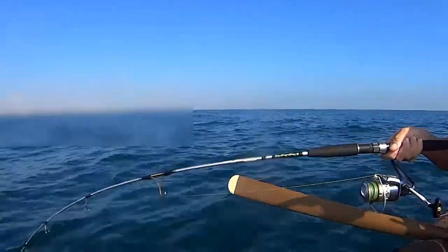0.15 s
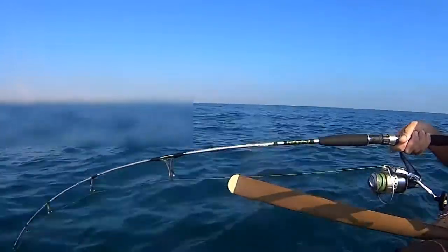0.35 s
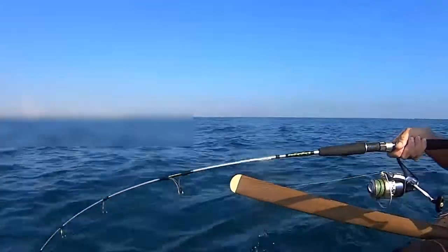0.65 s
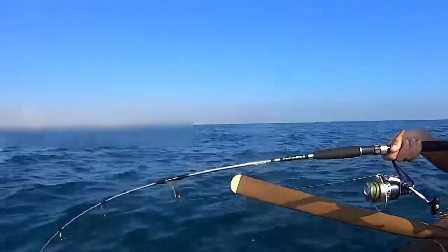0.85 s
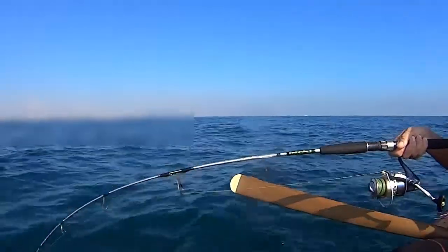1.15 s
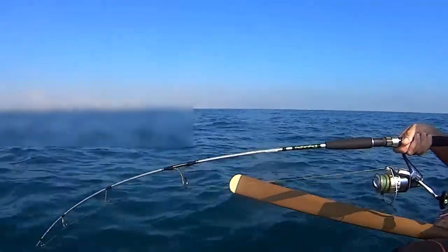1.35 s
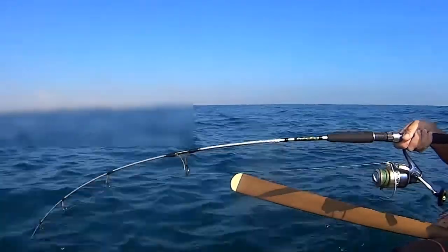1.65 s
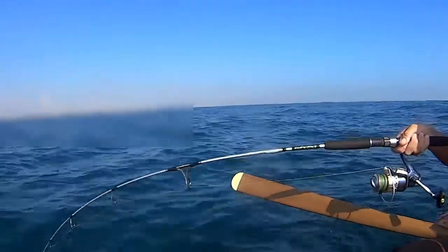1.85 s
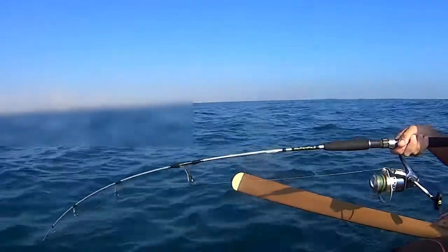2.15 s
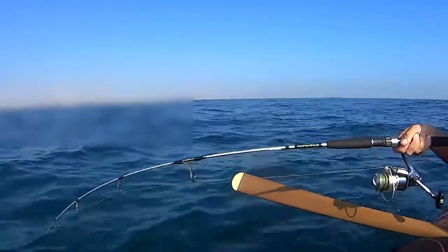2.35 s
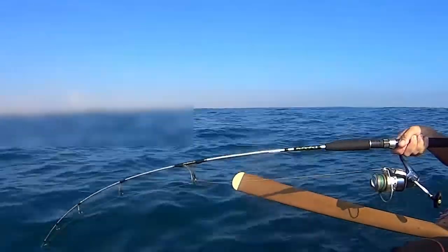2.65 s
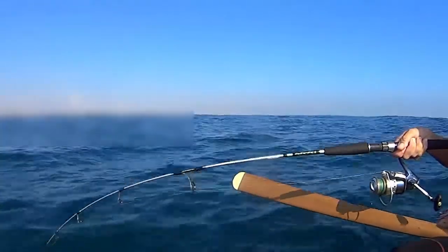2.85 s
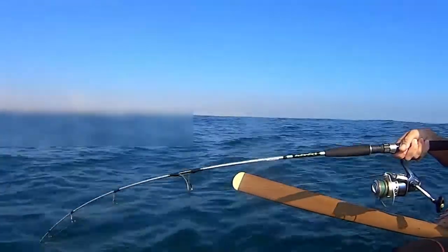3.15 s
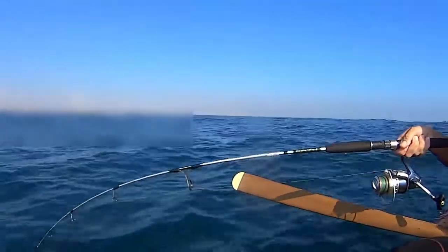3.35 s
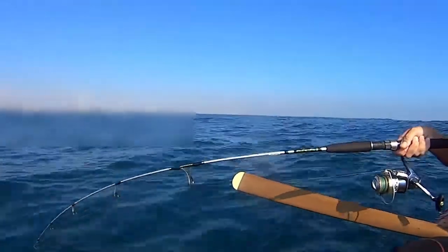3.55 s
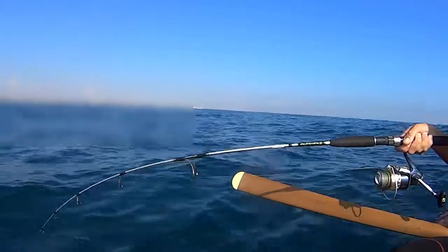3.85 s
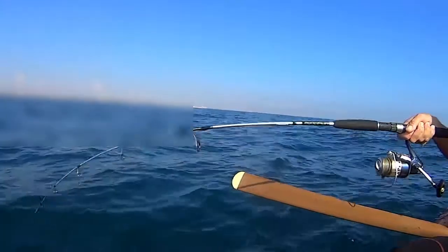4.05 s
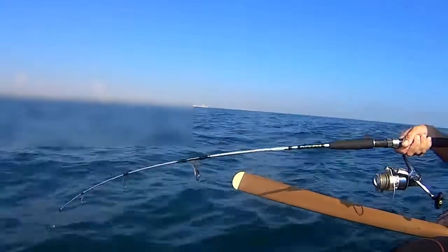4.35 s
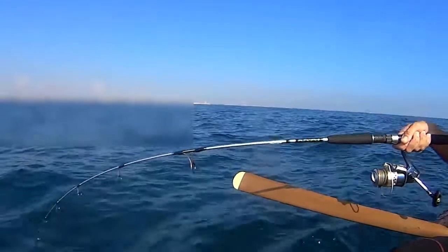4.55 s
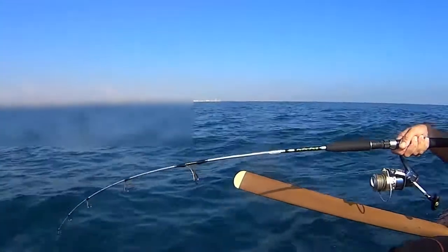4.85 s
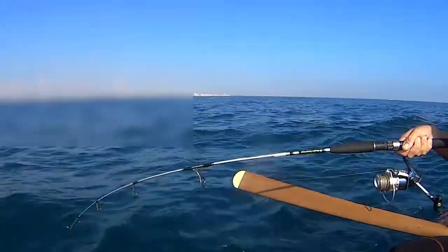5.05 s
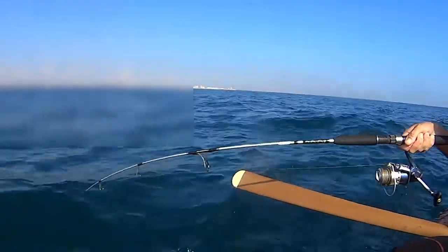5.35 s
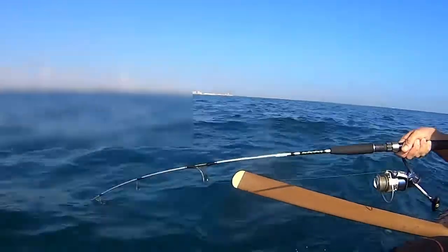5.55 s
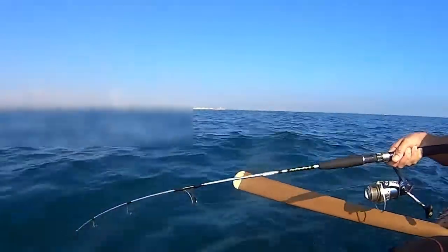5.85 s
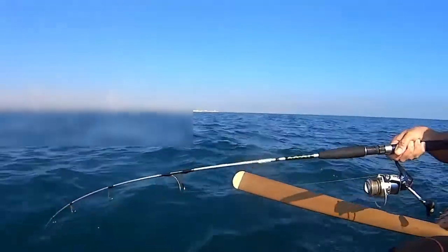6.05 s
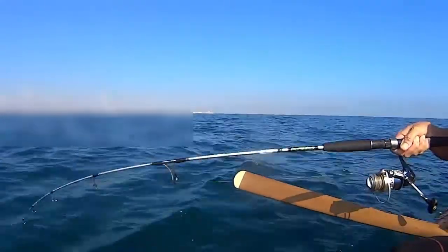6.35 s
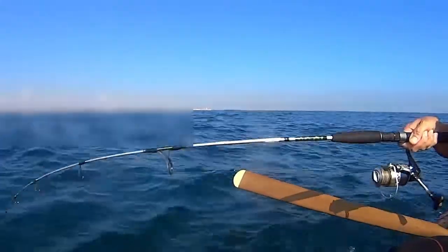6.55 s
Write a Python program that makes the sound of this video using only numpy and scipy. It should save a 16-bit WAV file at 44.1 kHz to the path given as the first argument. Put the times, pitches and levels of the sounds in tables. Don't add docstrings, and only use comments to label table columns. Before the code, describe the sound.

Metallic buzzing pulls of a spinning reel, then hollow thumps and sharp raps on a plastic hull over lapping water and faint hiss.

```python
import sys
import numpy as np
from scipy import signal
from scipy.fft import rfft, irfft
from scipy.io import wavfile
from scipy.ndimage import uniform_filter1d

SR = 44100
rng = np.random.default_rng(int(sys.argv[2]) if len(sys.argv) > 2 else 0)


def how_loud(loudness_db):
    steps = np.asarray(loudness_db, float) / 20
    return 10 ** steps


def dump_mix(stems):
    frames = np.atleast_2d(stems).T
    limited = np.clip(frames, -1, 1)
    pcm = np.round(limited * 32767).astype(np.int16)
    wavfile.write(sys.argv[1], SR, pcm)


N = 295911

# pitch_hz, left_over_right_db, left_leads_rad
PORT_RESPONSE = [(60, 0, -.5), (180, -4, -.2), (250, -5, .3), (320, -4, 1.3), (390, -3, -1.5),
                 (560, -1, -.3), (680, 1, -.7), (850, 2.5, -.9), (1150, 0, -.3), (1700, 1, -.4),
                 (2600, 2, .8), (3900, -2, 1.0), (5500, -3, .6), (9000, 0, -.2)]


def rms_one(x):
    return x / np.sqrt(np.mean(x ** 2) + 1e-20)


def peak_one(x):
    return x / np.abs(x).max()


def add_at(out, s, sound):
    start = round(s * SR)
    out[..., start:start + sound.shape[-1]] += sound


def in_time(rows):
    s, *columns = np.transpose(rows)
    return [np.interp(np.arange(N) / SR, s, c) for c in columns]


def bins_hz():
    return np.maximum(np.arange(N // 2 + 1) * SR / N, 1)


def at_hz(points, hz):
    table = np.array(points)
    return np.interp(np.log(hz), np.log(table[:, 0]), table[:, 1])


def drift(rate_hz):
    r = np.exp(-2 * np.pi * rate_hz * 40 / SR)
    noise = rng.standard_normal(N // 40 + 2002)
    slow = signal.lfilter([1], [1, -2 * r, r * r], noise)[2000:]
    return np.interp(np.arange(N) / 40, np.arange(len(slow)), rms_one(slow))


def resonate(x, hz, width_hz):
    r = np.exp(-np.pi * width_hz / SR)
    poles = [1, -2 * r * np.cos(2 * np.pi * hz / SR), r * r]
    return signal.lfilter(np.array([1, 0, -1]) * (1 - r * r) / 2, poles, x)


def shaped(x, spectrum):
    return irfft(rfft(x) * how_loud(at_hz(spectrum, bins_hz())), N)


def grains(per_s, spread_db):
    sizes = how_loud(spread_db * np.minimum(rng.exponential(1, N), 5)) * rng.choice([-1, 1], N)
    return rms_one(sizes * (rng.random(N) < per_s / SR))


def runs():
    # (time_s, ring_level_db)
    pulls = [
        (0, [(0.0, -43.5), (0.142, -62.5), (0.23, -52.5), (0.256, -64), (0.38, -49.5), (0.455, -62)]),
        (0, [(0.67, -65), (0.7, -47.5), (0.888, -49), (1.174, -48), (1.196, -53), (1.272, -42.5), (1.518, -41.5), (1.602, -42), (1.79, -57.5)]),
        (4, [(2.9, -70), (2.942, -54), (3.146, -58), (3.3, -51.5), (3.404, -45.5), (3.508, -46), (3.812, -43.5), (3.978, -45), (4.07, -60.5)]),
    ]
    # start_s, length_s, ring_level_db, sag_by_end_db, rasp_brightness_db
    short_tugs = [
        (1.927, 0.27, -46.5, 13.5, 2),
        (4.093, 0.14, -47.5, 7.5, 4),
        (4.3, 0.16, -48, 3.5, 5),
        (4.441, 0.25, -55, 7, 3.5),
        (5.075, 0.17, -56, 16, 4),
        (5.188, 0.155, -54, 9.5, 4.5),
        (5.445, 0.092, -53, -1, 2.5),
        (5.839, 0.089, -50.5, 24, 2.5),
    ]
    rise_s, start_db = 0.047, -15
    tugs = []
    for s, length_s, db, sag_db, bright_db in short_tugs:
        curve = [(s, db + start_db), (s + rise_s, db), (s + length_s, db - sag_db)]
        tugs.append((bright_db, curve))
    return pulls + tugs


def bites():
    # start_s, peak_level_db
    snaps = [(0.0044, -40), (0.058, -35), (0.123, -46), (0.155, -40.5), (0.2179, -38), (0.23, -43),
             (0.6938, -40), (0.8565, -37), (1.058, -43), (1.102, -39), (1.1546, -34.5), (1.2506, -40),
             (1.297, -31.5), (1.3613, -33), (1.447, -40), (1.486, -36), (1.5512, -31), (1.596, -29),
             (1.6194, -37), (1.978, -37.5), (2.1131, -41), (2.193, -41), (3.239, -39), (3.398, -33.5),
             (3.4655, -37), (3.486, -33.5), (3.713, -36), (3.7529, -50), (3.77, -34), (3.9664, -32),
             (4.132, -38), (4.316, -43), (4.371, -38), (4.431, -40.5)]
    t60_s, trim_db = 0.044, -3
    out, t = np.zeros(N + SR), np.arange(SR // 10) / SR
    for s, peak_db in snaps:
        fall = how_loud(peak_db + trim_db - 60 * (t / t60_s) ** 1.51)
        add_at(out, s, fall * np.minimum(t / 0.0026, 1))
    return out[:N]


def reel():
    # pitch_hz, width_hz, level_db
    spool = [(1370, 85, -4), (1695, 80, 8.5)]
    # pitch_hz, width_hz, level_db
    thin_parts = [(2650, 300, 9), (3708, 346, 11), (4020, 220, 12.5), (4300, 200, 10.5), (4570, 140, 11.5),
                  (4905, 280, 10.5), (5370, 170, 8), (6150, 450, 3), (7650, 670, -1), (9430, 450, -4),
                  (11700, 420, -9.5), (13400, 60, -5), (13900, 50, -7)]
    rasp_base_db, rasp_follows = -65.5, 1.16
    evenness = 0.19
    ring_gain, rasp_gain, t = np.zeros(N), np.zeros(N), np.arange(N) / SR
    for bright_db, run in runs():
        ring_db, = in_time(run)
        rasp_db = rasp_base_db + bright_db + rasp_follows * (ring_db + 50)
        gate = np.clip(np.minimum(t - run[0][0], run[-1][0] - t) / 0.017, 0, 1)
        ring_gain += gate * how_loud(ring_db)
        rasp_gain += gate * how_loud(rasp_db)
    speed = np.clip(ring_gain / how_loud(-45), .12, 1)

    slip = how_loud(2.5 * drift(28)) / np.sqrt(speed)
    teeth = grains(2500 * speed, 1.5) * slip
    low, high = (how_loud(db) * resonate(resonate(teeth, hz, 1.4 * w), hz, 2.26 * w) for hz, w, db in spool)
    ring = high + low * np.sqrt(speed)
    flutter = how_loud(0.9 * drift(29)) / np.sqrt(speed)
    ring = signal.sosfilt(signal.butter(4, 1950, fs=SR, output="sos"), ring)
    power = uniform_filter1d(uniform_filter1d(ring ** 2, size=90), size=90)
    ring = rms_one(ring / (power + 1e-12) ** (evenness / 2))

    shared = grains(5000 * speed, 2.2) * flutter
    sides = np.array([shared + .7 * grains(5000 * speed, 2.2) * flutter for side in range(2)])
    loose = (flutter * np.sqrt(speed)) ** 1.5
    rasp = 0
    for hz, w, db in thin_parts:
        rattle = np.roll(loose, int(37 * hz))
        rasp = rasp + how_loud(db) * rattle * resonate(resonate(sides, hz, 1.3 * w), hz, 3 * w)
    ring_level = np.hypot(how_loud(1.6) * ring_gain, bites())
    return ring_level * ring, how_loud(7.0) * rasp_gain * rms_one(rasp)


def wash():
    # time_s, level_db
    surges = [(0.0, -70), (0.37, -56), (1.81, -57.5), (2.18, -62.5), (2.65, -88), (3.16, -57.5),
              (3.4, -48.5), (3.57, -57), (4.24, -51.5), (4.37, -57), (4.7, -44), (4.9, -68.5),
              (5.16, -55.5), (5.68, -71.5), (5.96, -57), (6.2, -51.5), (6.5, -58), (6.71, -80)]
    # pitch_hz, density_db_per_hz
    slosh_colour = [(76, -16), (130, 1.5), (489, -6), (824, 1), (995, -14.5), (1680, -5.5), (2200, -23),
                    (2860, -59), (4840, -120)]
    hum_hz, hum_base_db, hum_follows = 78, -76.5, 1
    slosh_db, = in_time(surges)
    hum_db = hum_base_db + hum_follows * (slosh_db + 60)
    clicks, dealt = grains(260, 3.6), rng.integers(0, 16, N)
    gurgle = 0
    for k, hz in enumerate(np.geomspace(150, 2600, 16)):
        own_clicks = clicks * (dealt == k) + 1e-18
        gurgle = gurgle + resonate(own_clicks, hz, hz / 24.0) / np.sqrt(hz)
    gurgle_colour = [(hz, db + 3 * np.log2(hz)) for hz, db in slosh_colour]
    churn = rms_one(shaped(gurgle, gurgle_colour))
    churn = churn + 0.24 * rms_one(shaped(rng.standard_normal(N), slosh_colour))
    hum = resonate(resonate(rng.standard_normal(N), hum_hz, 63), hum_hz, 83)
    surge_db = 1.8 * drift(14)
    return how_loud(slosh_db - 3.5 + surge_db) * churn + how_loud(hum_db) * rms_one(hum)


def hiss():
    # pitch_hz, level_db
    hiss_colour = [(12, -12), (20, -2.5), (38, -7.5), (49, -11), (183, -11.5), (496, -11), (934, -14.5),
                   (1310, -12), (2540, -17.5), (6550, -22.5), (10800, -25.5), (14000, -53), (16000, -120)]
    # pitch_hz, left_right_likeness (0 to 1)
    likeness = [(25, 0.99), (70, 1), (200, 0.52), (600, 0), (3000, 0), (9000, 0.27)]
    level_db = -58.5
    mid, side = rfft(rng.standard_normal((2, N)))
    hz = bins_hz()
    alike = np.clip(at_hz(likeness, hz), 0, 1)
    pair = np.sqrt(1 + alike) * mid + np.sqrt(1 - alike) * side * np.array([[1], [-1]])
    return how_loud(level_db) * rms_one(irfft(pair * how_loud(at_hz(hiss_colour, hz)), N))


def panels():
    # start_s, peak_db, pitch_hz, left_over_right_db, ring_s
    panel_rings = [(0.018, -47.5, 363, -8, 0.067), (0.336, -41, 191, 3, 0.028),
                   (0.929, -43.5, 227, -0.5, 0.066), (1.129, -31.5, 204, -1.0, 0.032),
                   (1.504, -26, 341, 3, 0.045), (1.526, -32, 363, 1, 0.055), (1.802, -32.5, 203, -1, 0.063),
                   (3.215, -33, 354, -11, 0.042), (3.277, -14, 296, -1, 0.028),
                   (3.287, -14.5, 251, -8, 0.031), (3.323, -24, 259, -6, 0.037),
                   (3.514, -35, 364, -3.0, 0.037), (3.806, -29, 239, -5, 0.045), (3.923, -35, 320, -6, 0.05),
                   (4.092, -46, 233, -2.0, 0.03), (4.22, -35, 226, 0, 0.034), (4.277, -43, 336, 3, 0.036),
                   (4.47, -29, 244, -1.5, 0.05), (4.667, -57, 310, -1.5, 0.031),
                   (5.235, -32.5, 193, -1, 0.036), (6.041, -28, 252, -9, 0.053),
                   (6.137, -35, 349, -2.5, 0.045), (6.325, -34, 209, -2.0, 0.03),
                   (0.345, -37, 435, 1, 0.021), (1.13, -37, 860, 5, 0.023), (1.387, -40, 590, -2, 0.019),
                  (1.504, -27.5, 606, -6, 0.032), (1.802, -34.5, 576, -4, 0.033),
                  (2.655, -45.5, 826, -2, 0.059), (3.085, -42.5, 701, 3.5, 0.053),
                  (3.216, -36.5, 650, -4, 0.031), (3.282, -15.5, 705, 1.0, 0.036),
                  (3.291, -16.5, 733, -2, 0.026), (3.303, -15.5, 724, 5, 0.031),
                  (3.319, -22, 850, -2, 0.038), (3.338, -26.5, 723, 2, 0.055), (3.368, -23, 713, -3, 0.03),
                  (3.514, -25, 796, 1, 0.02), (3.631, -30.5, 873, 3, 0.024), (3.802, -23, 637, 11, 0.027),
                  (3.898, -35, 838, 5, 0.059), (3.924, -30.5, 860, 4, 0.05),
                  (4.209, -28.5, 837, 1.0, 0.038), (4.223, -26.5, 633, 1, 0.03),
                  (4.285, -25, 700, 3, 0.014), (4.395, -34.5, 826, 6, 0.023), (4.471, -30, 597, 6, 0.043),
                  (4.484, -35, 550, -2, 0.021), (4.67, -39, 832, 5, 0.027), (5.233, -36.5, 633, 0, 0.049),
                  (6.027, -26.5, 846, 3, 0.069), (6.152, -31, 632, 5, 0.025), (6.2, -38.5, 827, 5, 0.033),
                   (0.0451, -42, 1130, -3, 0.031), (1.8051, -32.5, 1122, 7, 0.022),
                  (3.2804, -26.5, 1420, -7, 0.012), (3.293, -16, 1098, 4, 0.03),
                  (3.318, -33, 1090, 10, 0.027), (3.3618, -26, 1175, 12, 0.023),
                  (3.5146, -29.5, 1177, 3, 0.024), (3.8041, -16, 1200, -1, 0.03),
                  (4.3625, -36, 1435, 3, 0.029), (4.724, -37, 1420, 0, 0.03),
                  (6.0255, -19.5, 1580, -1, 0.013), (6.034, -31, 1640, -1.5, 0.027),
                  (6.3262, -40.5, 1200, 2, 0.024), (6.453, -43, 1420, -3, 0.013),
                   (3.2794, -25, 2346, 2.0, 0.022),
        (3.2884, -24, 2570, 2.0, 0.017),
        (3.3114, -33.5, 2600, 3.8, 0.03),
        (3.336, -23, 1860, 2.0, 0.014),
        (3.8042, -17.5, 1860, 2.0, 0.015),
        (3.925, -24.5, 1880, 1.0, 0.013),
    ]
    rise_s, trim_db, sag = 0.0031, -3.0, 0.014
    out, t = np.zeros((2, N + SR)), np.arange(SR // 5) / SR
    for s, peak_db, hz, pan_db, ring_s in panel_rings:
        age = t / max(ring_s, .005)
        level = how_loud(peak_db + trim_db - 32.4 * age ** 1.66) * np.minimum(t / rise_s, 1)
        ring = level * np.sin(2 * np.pi * hz * t * (1 - sag * age))
        lean_db = pan_db - at_hz(np.array(PORT_RESPONSE)[:, :2], hz)
        add_at(out, s, np.outer(how_loud(np.array([.5, -.5]) * lean_db), ring))
    return out[:, :N]


def blows():
    # start_s, peak_db, lean_low_to_upper_modes_db, contact_s
    slaps = [(.039, -44.5, 2, 0.029), (.336, -39, -4, 0.017), (.689, -43.5, -1, 0.0099),
             (1.132, -40.5, 0.5, 0.014), (1.507, -22.5, -10.5, 0.016), (1.805, -33, -3, 0.015),
             (2.656, -35.5, 3, 0.014), (2.732, -41.5, 0.5, 0.0016), (3.289, -21.5, 1.5, 0.026),
             (3.514, -31.5, -1, 0.022), (3.734, -47, -20, 0.008), (3.805, -12.5, 7.5, 0.0068),
             (3.92, -31, 0, 0.027), (4.092, -43.5, 1, 0.012), (4.283, -36, -5, 0.0019),
             (4.439, -48, -15, 0.0054), (4.518, -53.5, -16, 0.0051), (5.034, -48, -20, 0.0047),
             (5.234, -35.5, -1.2, 0.019), (5.65, -49.5, 0.5, 0.0064), (5.987, -43.5, -9, 0.029),
             (6.025, -24.5, 4.5, 0.015), (6.198, -38.5, -2, 0.0095), (6.227, -42, -12, 0.0073),
             (6.325, -33.5, -8.5, 0.0081), (6.701, -40, -4, 0.0065)]
    taps = [(1.029, -49, 1, 0.012), (1.389, -39, -4.5, 0.022), (2.409, -50.5, 2, 0.012),
            (3.317, -22, 7.5, 0.026) , (3.633, -38.5, -2, 0.011), (4.207, -31.5, 0, 0.013),
            (4.224, -36, 4, 0.0042), (4.396, -36, 2.5, 0.0056), (4.417, -43.5, -7, 0.0051),
            (4.472, -29.5, -13.5, 0.0086), (5.075, -47, 6.5, 0.036), (5.421, -48.5, 8, 0.0056),
            (6.039, -31.5, -10, 0.019), (6.15, -32, -5, 0.023), (6.305, -45, 4, 0.0088)]
    raps = [(.318, -43.5, -1.5, .0071), (.622, -48.5, -1, 0.0072), (.93, -52.5, 4, 0.032),
            (3.086, -40, -0.5, 0.0079), (3.214, -33.5, -2, 0.0078), (3.278, -18, -1.5, 0.01),
            (3.34, -34, 0, 0.018), (3.364, -34, 1.5, 0.02), (4.665, -39, 0.5, 0.0035),
            (4.723, -42, 8, 0.036), (5.938, -42, 1, 0.0061), (6.133, -34.5, -1.5, 0.0074),
            (6.284, -43, -2.5, 0.014), (6.452, -47, 1.5, 0.014)]
    # middle modes above the other two (dB), crack above the upper modes (dB)
    kinds = (slaps, 0.32, -20.5), (taps, 6.2, -17), (raps, 0.18, 0.31)
    rows = []
    for table, focus_db, crack_db in kinds:
        for s, peak_db, lean_db, contact_s in table:
            shape = np.array([-lean_db, focus_db, lean_db])
            family_db = peak_db + shape - shape.max()
            rows.append((s, *family_db, family_db[2] + crack_db, contact_s))
    return sorted(rows)


def knocks():
    # pitch_hz, level_db, t60_s
    hull = [
        [(198.7, -3.5, 0.061), (236.6, 1.5, 0.042), (355.4, 1.5, 0.056), (413.4, -3, 0.13)],
        [(467.6, -2, 0.055), (567.6, -6.5, 0.098), (643.3, 6.5, 0.031), (738, 0, 0.061), (811, 1.5, 0.05)],
        [(1130, 0, 0.069), (1200, 4, 0.013), (1420, 3, 0.02), (1729, -12, 0.25), (1987, -2.5, 0.0051)],
    ]
    out, size = np.zeros((2, N + SR)), SR // 5
    t = np.arange(size) / SR
    crack_band = signal.butter(3, [1800, 2900], "band", fs=SR, output="sos")
    for s, *family_db, crack_db, contact_s in blows():
        noise, luck = rng.standard_normal(size), rng.standard_normal((3, 5, 3))
        push = noise * np.exp(-(t / max(contact_s, .002)) ** 2) * np.minimum(t / 0.00023, 1) + 1e-18
        push += 0.11 * noise * np.exp(-t / 0.055) * np.minimum(t / 0.0033, 1)
        push += 2.33 * np.exp(-t / 0.00033)
        blow = how_loud(crack_db - 2.5) * peak_one(signal.sosfilt(crack_band, push))
        for modes, db, chances, spread in zip(hull, family_db, luck, (.55, .4, .2)):
            rings = 0
            for (hz, mode_db, t60), (strength, load, spot) in zip(modes, chances):
                hz = hz * (1 + .02 * load)
                soft = resonate(push, hz, 0.26 * hz)
                ring = resonate(soft, hz, np.log(1000) / np.pi / t60) * np.sqrt(t60)
                ring = how_loud(mode_db + 2 * strength) * ring
                lean = spread * spot * (hz > 220)
                rings = rings + np.outer([1 + lean, 1 - lean], ring)
            blow = blow + how_loud(db - 0.5) * rings / np.abs(rings.mean(axis=0)).max()
        add_at(out, s, blow)
    return signal.sosfilt(signal.butter(8, 3150, fs=SR, output="sos"), out[:, :N])


def ratchet():
    # first_tooth_s, end_s, first_gap_ms, gap_over_last_gap, peak_db
    stretches = [(0.061, 0.155, 6.6, 1.32, -55), (0.298, 0.36, 11, 0.9, -60), (0.397, 0.45, 7.3, 1.36, -57),
                 (0.679, 0.73, 8, 0.88, -60), (0.735, 1.2, 4.2, 1.001, -61), (1.70, 1.8, 8, 1.06, -59),
                 (2.153, 2.205, 8, 1.28, -58), (2.916, 2.96, 10, 0.97, -58), (3.064, 3.15, 8.3, 1.11, -57),
                 (4.103, 4.15, 13, 0.82, -61), (4.442, 4.545, 8.5, 1.02, -61), (4.591, 4.625, 8, 1.2, -58),
                 (5.103, 5.29, 19.3, 1.01, -60), (5.505, 5.54, 5, 1.35, -57)]
    # pitch_hz, width_hz, level_db
    tooth = [(5500, 400, -7.5), (3620, 340, -12), (4450, 480, -13.5)]
    out, step = np.zeros((len(tooth), N)), np.arange(120)
    for s, end_s, gap_ms, stretch, peak_db in stretches:
        luck = rng.standard_normal((len(step), 4))
        gaps_s = gap_ms / 1000 * stretch ** step * (1 + .025 * luck[:, 0])
        times = s + np.cumsum(gaps_s) - gaps_s
        on = times < end_s
        out[:, (times[on] * SR).astype(int)] = how_loud(peak_db + 1.5 * luck[on, 1:].T)
    total = 0
    for clicks, (hz, w, db) in zip(out, tooth):
        ring = resonate(resonate(clicks + 1e-18, hz, w), hz, 2 * w)
        total = total + how_loud(db) * SR / w * ring
    return total


def drops():
    # start_s, peak_db, start_pitch_hz, ring_t60_s
    plops = [(.268, -50, 1240, 0.018), (0.4349, -50, 1092, 0.091), (0.4746, -39.5, 1140, 0.033),
             (0.505, -49, 1526, 0.042), (.5354, -50.5, 670, 0.025), (.622, -42, 2580, 0.014),
             (1.573, -45, 1190, 0.035), (2.371, -50, 1510, 0.017), (2.383, -55.5, 586, 0.046),
             (2.656, -37.5, 1960, 0.028), (2.832, -55.5, 1086, 0.054), (5.115, -40.5, 1620, .025),
             (5.297, -50.5, 1220, 0.051), (5.59, -56, 1330, 0.06), (5.7224, -54, 1400, 0.03),
             (5.894, -48.5, 1330, .018), (6.3876, -50.5, 1420, 0.02), (6.682, -59, 1370, 0.031)]
    spray = [(3.084, -50, 3330, 0.019), (0.7844, -54, 2400, 0.04), (0.8, -44, 2000, 0.022),
             (4.989, -55.5, 3000, 0.021), (3.914, -52, 1910, 0.02), (4.0344, -52, 2580, 0.024),
             (4.162, -39.5, 2460, 0.01), (4.364, -48, 2610, 0.041), (4.9412, -53.5, 2030, 0.027),
             (5.109, -42, 2650, 0.011), (5.344, -52, 2740, 0.013), (6.176, -53.5, 2570, 0.041),
             (6.1973, -55, 2650, 0.028), (6.3011, -48, 2380, 0.016)]
    glides = [
        (5.214, -46, 1194, 0.041),
        (5.325, -54, 904, 0.043),
        (6.083, -51, 1380, .02),
        (6.157, -37.5, 1162, 0.034),
        (6.171, -37.5, 1380, 0.036),
        (6.376, -53, 1318, 0.042),
        (4.358, -44, 1240, 0.026),
    ]
    # start_s, peak_db, ring_t60_s
    creep = [
        (0.169, -45, 0.028),
        (0.2987, -42, 0.019),
        (4.733, -40.5, 0.023),
        (4.889, -38, 0.023),
        (5.1555, -41, 0.016),
        (5.2605, -30.5, 0.011),
        (5.559, -46.5, 0.023),
        (5.6258, -49, 0.053),
        (6.0984, -51, 0.027),
        (6.574, -52, 0.034),
    ]
    rows = [(*drop, 0.069) for drop in plops]
    rows += [(*drop, 0.068) for drop in spray]
    rows += [(*drop, 0.332) for drop in glides]
    rows += [(s, db, 1697, t60, 0.042) for s, db, t60 in creep]
    out, t = np.zeros(N + SR), np.arange(SR // 5) / SR
    for s, peak_db, hz, t60, rise in rows:
        age = t / max(t60, .005)
        phase = 2 * np.pi * np.cumsum(.97 * hz * 2 ** np.minimum(rise * age * 2, 2)) / SR
        wobble = 1 + 0.58 * np.sin(2 * np.pi * (110 * t + rng.random()))
        level = how_loud(peak_db + 2.5 - 60 * age ** 2) * np.minimum(t / 0.0034, 1)
        add_at(out, s, level * np.sin(phase) * wobble)
    return out[:N]


def booms():
    # start_s, peak_db, pitch_hz
    hull_air = [(0.337, -54, 103.3), (1.133, -53, 91), (1.507, -52, 92), (1.803, -49, 97.3),
                (3.276, -31, 101.3), (3.401, -45.5, 98.7), (3.516, -51.5, 99), (3.802, -44.5, 94.6),
                (3.917, -50, 97.2), (4.47, -54, 99.2), (4.729, -51.5, 91.8), (5.235, -50.5, 98),
                (5.561, -52.5, 83), (5.618, -52, 74.4), (6.029, -51, 95.6), (6.144, -52.5, 98),
                (6.2, -56, 101), (6.331, -52, 102)]
    out, t = np.zeros(N + SR), np.arange(SR // 2) / SR
    shove = 0.41 * np.sin(2 * np.pi * 45 * t) * np.exp(-t / 0.024)
    for s, peak_db, hz in hull_air:
        cycles = hz * (.9 * t + .012 * (1 - np.exp(-t / 0.041)))
        swell = how_loud(-60 * t / 0.44) * np.sin(2 * np.pi * cycles) * (1 - np.exp(-t / 0.0024))
        slop = .5 * how_loud(-60 * t / 0.34) * rms_one(resonate(rng.standard_normal(len(t)), 121, 76))
        other = 0.53 * how_loud(-60 * t / 0.35) * np.sin(2 * np.pi * .81 * hz * t) * (1 - np.exp(-t / 0.0062))
        add_at(out, s, how_loud(peak_db + 3.5) * (swell + other + shove + slop))
    return out[:N]


def ticks():
    # start_s, peak_db, length_s
    contacts = [(0.609, -43, 0.0025), (3.279, -41, 0.01), (3.289, -40, 0.014), (3.804, -35.5, 0.012),
                (4.724, -43, 0.005), (4.906, -50, 0.0044), (5.941, -47.5, 0.0026), (6.025, -42.5, 0.007),
                (6.038, -46.5, 0.0076), (6.133, -50, 0.004), (6.173, -49, 0.0058)]
    out, t = np.zeros((2, N + SR)), np.arange(SR // 20) / SR
    bright = signal.butter(3, [4000, 12500], "band", fs=SR, output="sos")
    for s, peak_db, length_s in contacts:
        fade = np.exp(-t / max(length_s, .0005)) * np.minimum(t / 0.00092, 1)
        middle, side = rng.standard_normal((2, len(t))) * fade
        puff = np.cumsum([middle + 0.9 * side, middle - 0.71 * side], axis=1)
        add_at(out, s, how_loud(peak_db + 1.5) * peak_one(signal.sosfilt(bright, puff)))
    return out[:, :N]


def ports(x):
    hz = bins_hz()
    table = np.array(PORT_RESPONSE)
    level_db, lead_rad = at_hz(table[:, :2], hz), at_hz(table[:, ::2], hz)
    half = how_loud(level_db / 2) * np.exp(.5j * lead_rad)
    return irfft(rfft(x) * np.array([half, 1 / half]), N)


def scene():
    ring, rasp = reel()
    water = 0.92 * wash() + 0.41 * np.array([wash(), wash()])
    hull = knocks() + panels() + booms()
    return ports(ring + rasp + ratchet() + hull + drops() + ticks() + water) + hiss()


def band_limit(x):
    return signal.sosfilt(signal.butter(12, 15200, fs=SR, output="sos"), x)


def record(dry):
    return band_limit(dry)


dry = scene()
out = record(dry)
dump_mix(out)
```